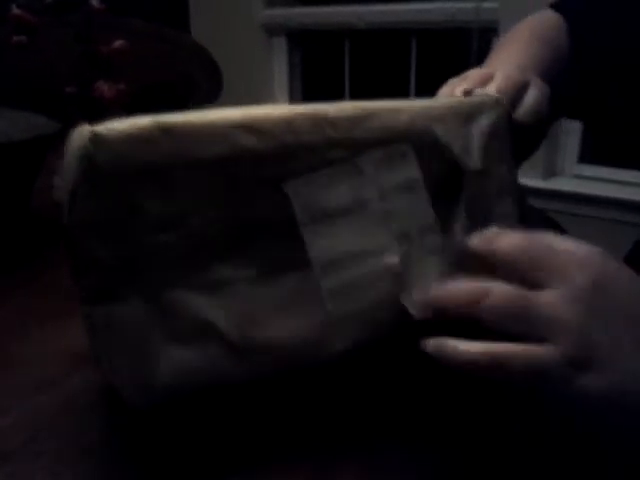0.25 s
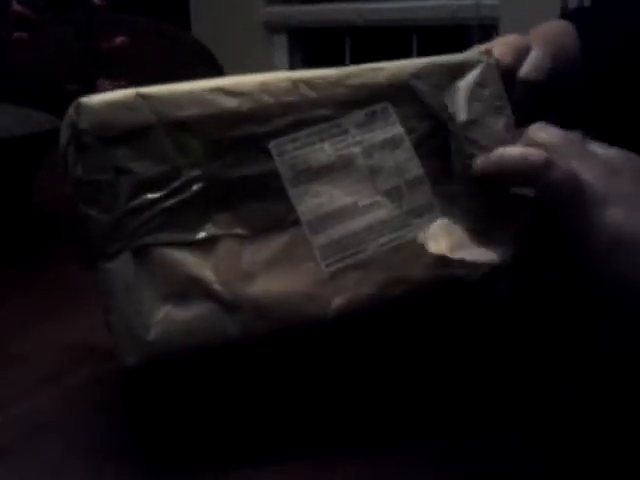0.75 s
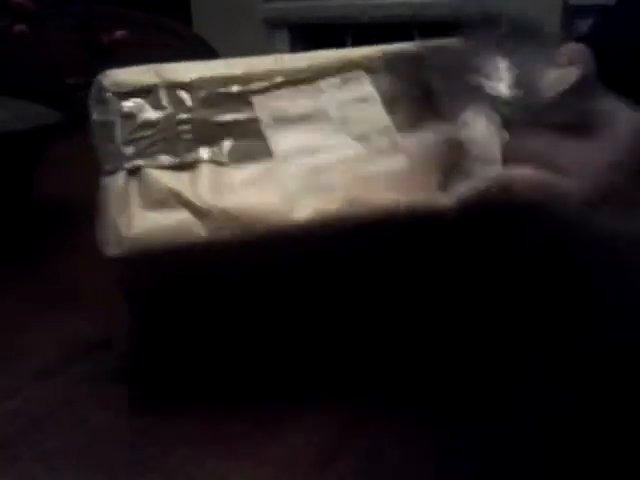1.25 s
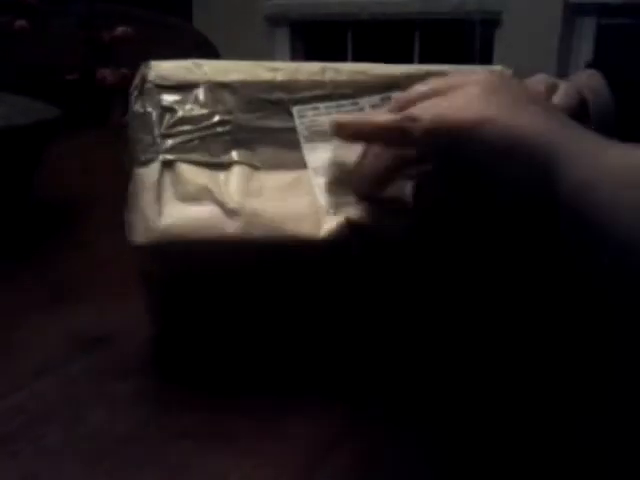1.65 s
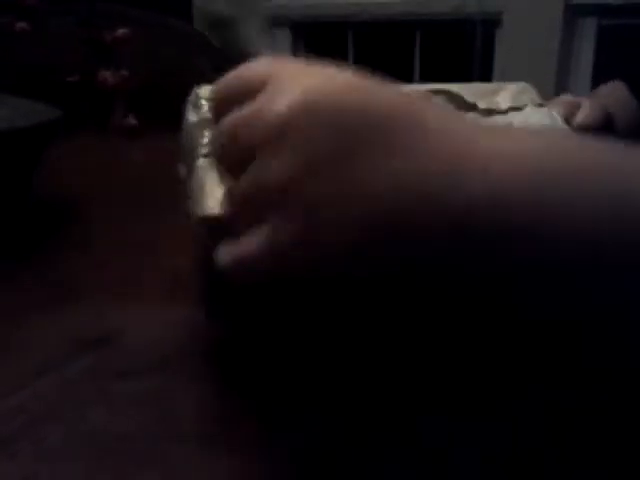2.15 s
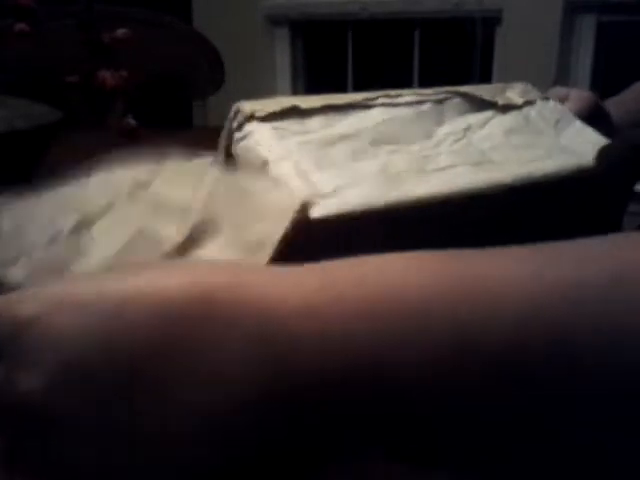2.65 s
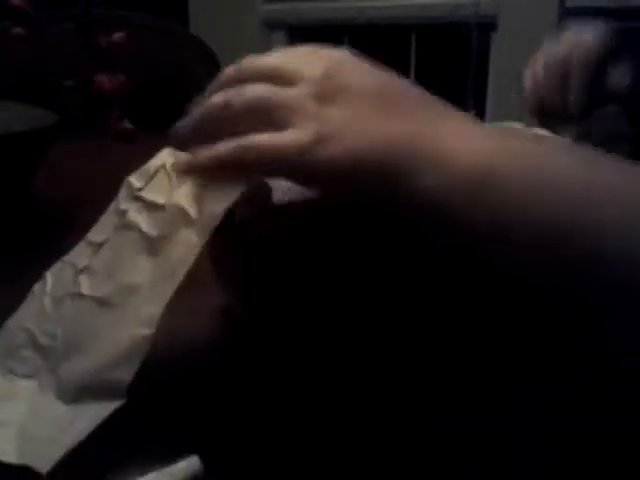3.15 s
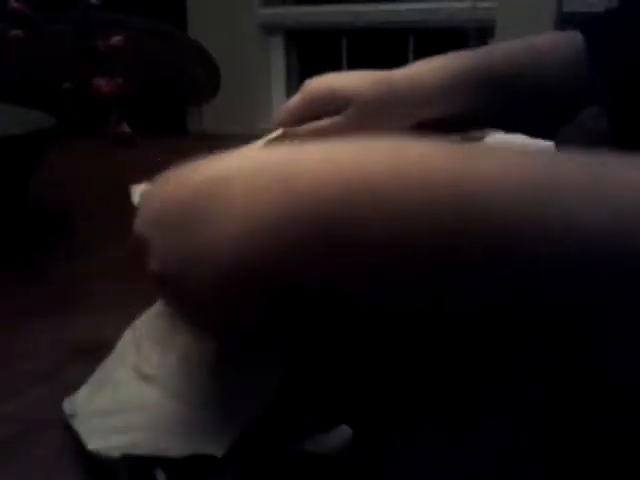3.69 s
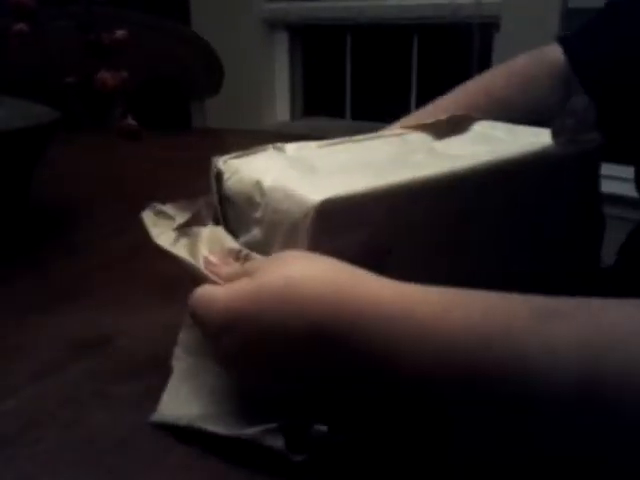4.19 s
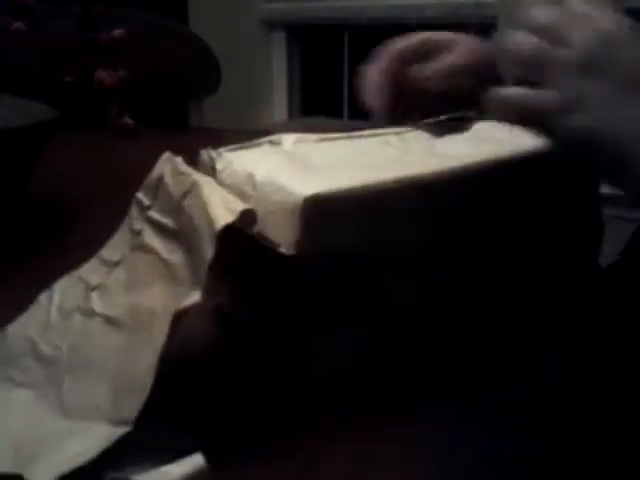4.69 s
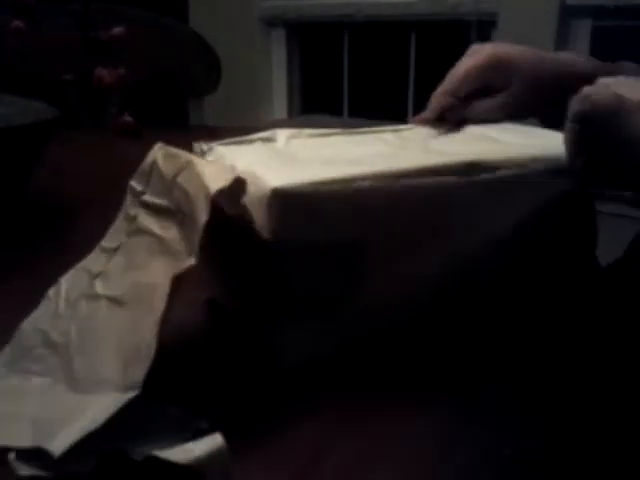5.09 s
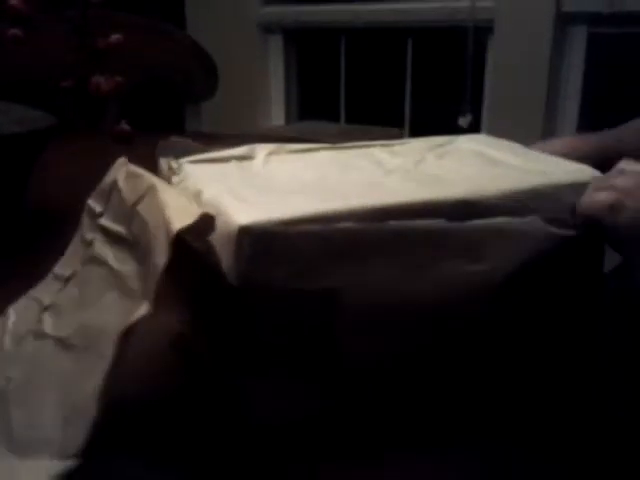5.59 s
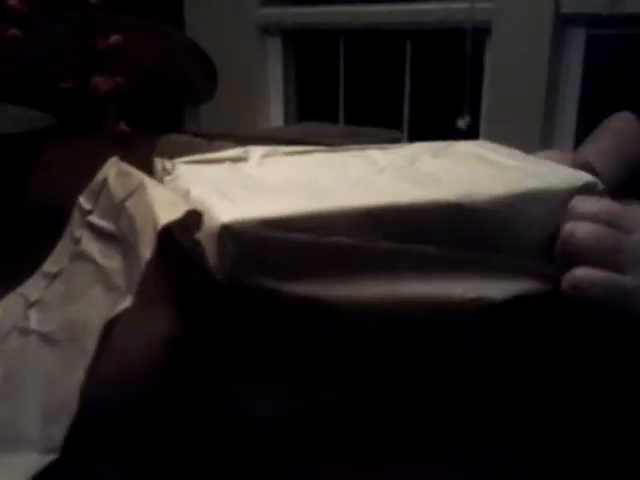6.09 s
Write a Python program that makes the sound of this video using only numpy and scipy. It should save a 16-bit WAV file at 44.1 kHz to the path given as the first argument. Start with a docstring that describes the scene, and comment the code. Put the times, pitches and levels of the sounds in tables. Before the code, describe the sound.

Stiff wrapping paper is pulled off a cardboard parcel by hand, very close to the microphones. It opens with a sharp crunch, then lighter rustling and dry ticks, and another loud, quick crunch at about 1 second. Near 1.8 seconds tugs jolt the box with a few short hollow knocks. A longer hissing rip follows from about 1.9 to 2.3 seconds, running into dense crackling with the loudest snaps and another knock near 2.7 seconds. The paper eases briefly around 3 seconds, then is crushed again from about 3.5 to 4.5 seconds, a little fuller in tone. From 5 seconds come shorter crinkles and separate crease snaps, with a last crunch near 6.2 seconds. The room is quiet and fairly dry, with a soft low rumble and faint hum throughout.

```python
"""A table in a quiet room, a pair of small microphones close to a parcel being unwrapped.
Hands tear and crumple the stiff paper: creases buckle with short snaps and dry ticks over a dense
crackle of fibres, one long rip hisses, and tugs knock the cardboard box. The house rumbles and hums
softly underneath. The microphones ring near 7 kHz and overload on the loudest snaps."""
import sys
import numpy as np
from scipy import signal
from scipy.io import wavfile
from scipy.ndimage import map_coordinates

SR = 44100
rng = np.random.default_rng(int(sys.argv[2]) if len(sys.argv) > 2 else 0)


def unload_wav(signal):
    """Save mono or channel-first audio to the path in sys.argv[1] as 16-bit WAV at rate SR, clipped to [-1, 1]."""
    wavfile.write(
        sys.argv[1],
        SR,
        np.round(np.clip(np.atleast_2d(signal).T, -1, 1) * 32767).astype(np.int16),
    )


N = 279617
EDGES_HZ = 30 * 2 ** np.arange(0, 9.6, .5)   # half-octave bands
PORT_HZ, PORT_WIDTH_HZ, PORT_DB = 7216, 1210, 10.5   # resonance of the microphone ports


def amp(db):
    """Gain of a level in dB."""
    return 10 ** (np.asarray(db) / 20)


def unit_rms(x):
    """Scale to unit rms."""
    return x / np.sqrt(np.mean(x ** 2) + 1e-20)


def at_hz(rows, hz):
    """Columns of a table read on a log-frequency axis."""
    f, *columns = np.transpose(rows)
    return [np.interp(np.log(hz), np.log(f), c) for c in columns]


def in_time(rows):
    """Columns of a table as curves, one value a sample."""
    s, *columns = np.transpose(rows)
    return [np.interp(np.arange(N) / SR, s, c) for c in columns]


def resonance(x, hz, width_hz):
    """Two-pole band-pass, gain 1 on top."""
    r = np.exp(-np.pi * width_hz / SR)
    poles = [1, -2 * r * np.cos(2 * np.pi * hz / SR), r * r]
    return signal.lfilter((1 - r * r) / 2 * np.array([1, 0, -1]), poles, x)


def filtered(x, hz, kind="band", order=2):
    """Smooth band-, low- or high-pass."""
    return signal.sosfilt(signal.butter(order, hz, kind, fs=SR, output="sos"), x)


def half_octave(x, k):
    """Band number k of a signal."""
    return filtered(x, [EDGES_HZ[k], min(EDGES_HZ[k + 1], .45 * SR)])


# The stereo image. Each row: frequency in Hz, likeness of the two sides (0-1), left minus right in dB.
STEREO_IMAGE = [(202, 0.9, 0.5), (480, 0.88, 0), (1050, 0.35, -1.5), (2050, 0.39, 1.5), (5350, 0.08, 1.5),
                (11800, 0, 4)]
def mic_pair(mid, side, hz):
    """Two microphones hear nearly the same bass but unlike treble."""
    alike, tilt_db = at_hz(STEREO_IMAGE, hz)
    both = np.sqrt(1 + alike) * mid + np.sqrt(1 - alike) * side * [[1], [-1]]
    return both * amp([[tilt_db / 2], [-tilt_db / 2]]) / np.sqrt(2)


# Room tone behind the table. Each row: frequency in Hz, relative spectral density in dB.
RUMBLE_SPECTRUM = [(70, -11), (130, -13), (210, -6.5), (320, -1), (420, -13.5), (520, -12), (800, -12.5),
                   (1300, -26.5), (15000, -47)]
def rumble(level_db=-35):
    """Steady low noise of the house, nearly the same at both microphones."""
    white = rng.standard_normal((2, 2, N))
    out = 0
    for k in range(len(EDGES_HZ) - 1):
        hz = np.sqrt(EDGES_HZ[k] * EDGES_HZ[k + 1])
        out = out + amp(at_hz(RUMBLE_SPECTRUM, hz)[0]) * mic_pair(*half_octave(white[k % 2], k), hz)
    return amp(level_db) * unit_rms(out)


# Faint hum of the house. Each row: pitch in Hz, level in dB.
HUM_TONES = [(328, -46.5)]
def hum(width_hz=2.6):
    """A wavering low tone, the same at both microphones."""
    return sum(amp(db) * unit_rms(resonance(rng.standard_normal(N), hz, width_hz))
               for hz, db in HUM_TONES)


def room_echoes(x, t60_s=0.085, level_db=-13):
    """Table and walls return a short decaying scatter of echoes, partly shared by the microphones."""
    t = np.arange(SR // 3) / SR
    shared, left, right = rng.standard_normal((3, len(t)))
    tail = (0.54 * shared + np.array([left, right])) * amp(-60 * t / t60_s) * (t > .003)
    tail = amp(level_db) * tail / np.sqrt((tail ** 2).sum(axis=1, keepdims=True))
    return signal.fftconvolve(x, tail, axes=1)[:, :N]


# Where the hands are before the microphones.
# Each row: time in seconds, left minus right in dB, lag of the left side in samples.
HAND_POSITIONS = [(0, -3, -3.5), (1.7, -3, 1), (2.2, -4.5, 4), (4.2, -4, 1), (4.7, -3, -3.5)]
def at_hands(x):
    """Level and delay between the microphones shift as the hands move."""
    pan_db, lag = in_time(HAND_POSITIONS)
    left = map_coordinates(x[0], [np.arange(N) - lag], order=3)
    return np.array([left * amp(pan_db / 2), x[1] * amp(-pan_db / 2)])


# The box on the table, hollow then lid. Each row: pitch in Hz, time to fall 60 dB in seconds.
BOX_MODES = [(300, 0.024), (690, 0.017)]
# Tugs on the parcel. Each row: start in seconds, level of the hollow in dB, level of the lid in dB.
BOX_KNOCKS = [(1.709, -42.5, -9), (1.768, -34, -8), (1.829, -5.5, -4), (1.872, -4.5, -2), (2.32, -12, -13),
              (2.691, -5.5, -22), (3.712, -28, -9)]
def box_knocks(attack_s=0.00057):
    """A tug on the paper jolts the cardboard box, whose two modes ring briefly."""
    out, t = np.zeros(N), np.arange(4096) / SR
    attack = 1 - np.exp(-t / attack_s)
    for s, *levels_db in BOX_KNOCKS:
        i = int(s * SR)
        for (hz, t60), level_db in zip(BOX_MODES, levels_db):
            out[i:i + len(t)] += amp(level_db - 60 * t / t60) * attack * np.sin(2 * np.pi * hz * t)
    return out


# The long rip. Each row: time in seconds, centre in Hz, level against the crackle in dB.
RIP_PATH = [(1.88, 6460, -41), (1.95, 6300, -6), (2.07, 6300, -11), (2.17, 7340, -30), (2.25, 7850, -1),
            (2.33, 6700, -28.5)]
def long_rip(crackle_db, half_width_hz=600):
    """The tear hisses in a narrow band that slides with the width of the strip."""
    hz, level_db = in_time(RIP_PATH)
    slow_noise = filtered(rng.standard_normal((2, 2, N)), half_width_hz, "low")
    phase = 2 * np.pi * np.cumsum(hz) / SR
    mid, side = slow_noise[0] * np.cos(phase) + slow_noise[1] * np.sin(phase)
    return amp(crackle_db + level_db) * unit_rms(mic_pair(mid, side, hz=7000))


# The sheet between pulls. Each row: time in seconds, crackle level in dB, body against treble in dB.
SHEET_RUSTLE = [(0, -21.5, 10.5), (0.2, -36.5, -2.5), (0.43, -39, -0.5), (0.9, -35, 4), (1.1, -35.5, 8),
                (1.28, -41.5, -8), (1.85, -29, 6), (2.1, -24, -2), (2.75, -37.5, 7), (3.2, -45.5, -1),
                (3.55, -30.5, -2), (4.25, -32.5, -3.5), (4.65, -36, 0.5), (5.2, -25, -2.5), (5.65, -31, 0),
                (6.34, -28, 1)]
# Pulls that crunch the paper.
# Each row: peak time in seconds, crackle level in dB, length in seconds, body against treble in dB.
HAND_PULLS = [(0.027, -16, 0.086, -6.5), (0.108, -20.5, 0.036, 2.5), (0.283, -29.5, 0.15, 0.5),
              (0.506, -24.5, 0.035, -4), (0.651, -25, 0.033, -1), (0.785, -21, 0.055, -4),
              (1.025, -8.5, 0.034, -0.5), (1.058, -21.5, 0.18, -4), (1.4, -29.5, 0.21, 1),
              (1.647, -22, 0.16, -3), (1.833, -11, 0.013, 1), (1.896, -18.5, 0.3, -1.5),
              (2.243, -17.5, 0.17, -0.5), (2.507, -20.5, 0.38, -4), (2.697, -20.5, 0.16, -2.5),
              (2.913, -29.5, 0.18, -1), (3.37, -31.5, 0.26, 1), (3.709, -16, 0.044, -4.5),
              (3.903, -23.5, 0.64, 0.5), (4.11, -19.5, 0.12, 1.5), (4.162, -20, 0.056, -5.5),
              (4.32, -23, 0.037, 4), (4.345, -26, 0.19, 1.5), (4.511, -25.5, 0.14, -5),
              (4.98, -27, 0.21, -4), (5.027, -28.5, 0.033, 7), (5.153, -23.5, 0.088, 4),
              (5.269, -21, 0.077, -4), (5.49, -23, 0.075, -3.5), (5.774, -28, 0.033, 9),
              (5.943, -27, 0.049, 10), (6.17, -17.5, 0.081, -2.5), (6.335, -31, 0.041, -16)]
def hands(rise_db=22, fall_db=15.5, roundness=1.123):
    """Level and colour of the crackle: rustle and swelling pulls add in power, the loudest leading."""
    t = np.arange(N) / SR
    rustle_db, rustle_body_db = in_time(SHEET_RUSTLE)
    power = amp(2 * rustle_db)
    weighted_body = power * rustle_body_db
    for s, peak_db, length_s, body_db in HAND_PULLS:
        lengths_away = np.minimum(abs(t - s) / length_s, 8)
        drop_db = np.where(t < s, rise_db, fall_db) * lengths_away ** roundness
        pull = amp(2 * (peak_db - drop_db))
        power = power + pull
        weighted_body = weighted_body + pull * body_db
    return 10 * np.log10(power), weighted_body / power


# Colour of the paper up close. Each row: frequency in Hz, relative spectral density in dB.
PAPER_SPECTRUM = [(150, -12), (300, -1), (480, -8), (700, -1.5), (1100, -1), (1800, 2.5), (3200, -0.5),
                  (5200, -5), (14500, -4)]
# Low end of the crackle, fuller once the loose sheet is crushed. Each row: time in seconds, gain in dB.
CRACKLE_LOWS = [(2.6, 0.5), (4.2, 2), (4.8, 1)]
# Top octave of the crackle. Each row: time in seconds, gain in dB.
CRACKLE_HIGHS = [(2.8, -3.5), (3.2, -7), (5.2, -11), (6.34, -5)]
LOWS_BELOW_HZ, BODY_BELOW_HZ, HIGHS_ABOVE_HZ = 1400, 4500, 10000
CREASES_PER_S = 450   # at a crackle level of -30 dB
CREASE_SPREAD_DB, CREASE_COLOUR_DB, CREASE_MS = 5.5, 5, 0.7
CLUMP_DB, CLUMPS_PER_S = 1.8, 18   # creases give way in clumps
FIBRES_DB, FIBRES_DULL_DB = -3.5, 4   # hiss against the creases; its loss per octave above PORT_HZ
def crackle(crackle_db, body_db):
    """Small creases pop at random, each a brief noise burst with its own colour, over tearing fibres."""
    busy = amp(0.52 * (crackle_db + 30.0))   # harder pulling folds more creases at once
    creases = rng.choice(N, size=N // 30, replace=False)   # moments when one could give way
    count = len(creases)
    gives_way = rng.random(count) < busy[creases] * CREASES_PER_S * N / SR / count
    size_db = CREASE_SPREAD_DB * np.minimum(rng.exponential(1, count), 1.6)
    colour = rng.standard_normal((count, len(EDGES_HZ)))
    white = rng.standard_normal((2, 2, N))
    clumps = filtered(rng.standard_normal((2, N)), [CLUMPS_PER_S / 2, CLUMPS_PER_S * 2])
    body_db = body_db + CLUMP_DB * unit_rms(clumps[0])
    crackle_db = crackle_db + CLUMP_DB / 2 * unit_rms(clumps[1])
    lows, highs = amp(in_time(CRACKLE_LOWS)[0]), amp(in_time(CRACKLE_HIGHS)[0])
    body, treble = 0, 0
    for k in range(4, len(EDGES_HZ) - 1):
        hz = np.sqrt(EDGES_HZ[k] * EDGES_HZ[k + 1])
        colour_db = CREASE_COLOUR_DB * (colour[:, k] + colour[:, k + 1]) / np.sqrt(2)
        pops = np.zeros(N)
        pops[creases] = gives_way * amp(size_db + colour_db)
        fade = np.exp(-1000 / (SR * CREASE_MS * (1 + 1500 / hz)))   # lower panels shake longer
        swell_and_fade = np.convolve([1, -fade], [1, -fade ** 1.04])
        bursts = unit_rms(signal.lfilter([1], swell_and_fade, pops + 1e-18) / np.sqrt(busy))
        fibres = amp(FIBRES_DB - FIBRES_DULL_DB * max(np.log2(hz / PORT_HZ), 0)) * busy ** 0.45
        mid, side = half_octave(white[k % 2] * np.hypot(bursts, fibres), k)
        heard = amp(at_hz(PAPER_SPECTRUM, hz)[0]) * mic_pair(mid, side, hz)
        heard *= highs if hz > HIGHS_ABOVE_HZ else lows if hz < LOWS_BELOW_HZ else 1
        if hz < BODY_BELOW_HZ:
            body = body + heard
        else:
            treble = treble + heard
    return amp(crackle_db + body_db) * unit_rms(body) + amp(crackle_db) * unit_rms(treble)


# Dry ticks close to the microphones. Each row: start in seconds, level in dB.
PAPER_TICKS = [(0.491, -9.5), (0.697, -10), (0.768, -8), (0.778, -6), (0.855, -20), (1.238, -15),
               (1.347, -10), (1.456, -17), (1.459, -0.5), (1.491, -8), (1.594, -8), (1.765, -0.5),
               (1.911, 5), (1.985, 9), (2.009, 9), (2.145, 0), (2.177, 3), (2.36, -1.5), (2.4174, -6),
               (2.4954, 7), (2.513, 3), (2.5215, 6.5), (2.5365, 0), (2.578, -10), (2.591, -4), (2.6195, 9),
               (2.663, -5), (2.8902, 0.5), (3.033, -11.5), (3.2527, -9.5), (3.304, -8), (3.399, -16),
               (3.462, -1), (3.6078, -13), (3.6248, -13), (3.822, -5.5), (3.86, -11), (3.934, 1),
               (4.029, 1), (4.417, -11.5), (4.674, -10.5), (4.9085, -13), (4.9585, -4), (5.008, -11),
               (5.05, -19), (5.0725, -19), (5.131, -4), (5.205, 2), (5.233, -11), (5.369, -7), (5.398, -12),
               (5.441, -4), (5.483, -13), (5.902, -21)]
def ticks(decay_s=0.000325, band_hz=(2360, 9200)):
    """Taut paper parts with a quick bright burst; no panel rings."""
    out, t = np.zeros((2, N + 256)), np.arange(256) / SR
    for s, level_db in PAPER_TICKS:
        burst = rng.standard_normal((2, len(t))) * t * np.exp(-t / decay_s)
        tick = mic_pair(*filtered(burst, band_hz), hz=2400)
        i = int(s * SR)
        out[:, i:i + len(t)] += amp(level_db) * tick / abs(tick.mean(0)).max()
    return out[:, :N]


# Creases snapping close to the microphones.
# Each row: start in seconds, ring level in dB, ring pitch in Hz, crack level in dB.
CREASE_SNAPS = [(0.108, -5, 1720, -4), (0.325, -9, 1890, -29), (0.352, -10.5, 2670, -9.5),
                (0.4557, -13, 2890, -22), (0.4976, -1, 2730, -4.5), (0.504, -9, 2250, -6.5),
                (0.511, -4.5, 2440, -30), (0.554, -4.5, 3550, -31), (0.706, -7, 3100, -8.5),
                (0.7495, -10, 2140, -31), (0.803, -3.5, 2000, -14), (0.842, -1, 1960, -30),
                (0.8665, -10.5, 2770, -32), (1.622, -0.5, 4220, -15), (1.7077, -5.5, 2370, -8),
                (1.7684, -6, 1680, -22), (1.821, -2, 1520, -4.5), (1.8407, 7, 1700, -17),
                (1.869, 5.5, 2390, -1), (2.271, 4.5, 3940, -22), (2.3215, -7, 1980, -3),
                (2.4468, -0.5, 4100, -0.5), (2.686, 3, 1730, 0), (2.823, -6.5, 1570, -8),
                (3.3393, -9.5, 2170, -6), (3.453, -8.5, 1830, -10), (3.474, -3.5, 1640, -12),
                (3.485, -5, 2000, -12), (3.5703, -3.5, 1550, -8), (3.6502, -9, 1540, -9),
                (3.7026, -6.5, 1830, -28), (3.714, 0, 1350, -21), (3.913, -6, 1230, -16),
                (3.979, -4, 1860, -9), (4.005, -1.5, 2600, -11), (4.0199, 1, 2500, -15),
                (4.08, -10.5, 3000, -21), (4.317, -12.5, 1640, -11), (5.095, -8.5, 2000, -23),
                (5.109, -4, 2080, -14), (5.305, -10.5, 1890, -22), (5.426, -7, 1380, -10),
                (5.508, -4.5, 2240, -10.5), (5.6428, -5, 2130, -5.5), (5.6773, -2.5, 2010, -44),
                (5.7407, 0, 2470, -9), (5.7945, -5.5, 1890, -39), (5.8466, -2, 2140, -7.5),
                (5.887, -11, 1930, -33), (5.9253, 1, 2540, -1), (5.967, -9, 2360, -14),
                (6.181, -3, 1860, 1.5), (6.323, -4.5, 1730, -4.5)]
SNAP_S = 0.00368   # time scale at 0 dB and 2 kHz; louder and lower panels snap longer
def snaps(growth=0.43, pitch_law=0.45, ring_width_share=0.45, crack_band_hz=(3800, 12000)):
    """A crease buckles: a bright crack, and the flat panel beside it rings for a few cycles."""
    out, t = np.zeros((2, N + 1024)), np.arange(1024) / SR
    for s, ring_db, hz, crack_db in CREASE_SNAPS:
        length_s = SNAP_S * amp(growth * ring_db) * (2000 / hz) ** pitch_law
        attack = 1 - np.exp(-(t / (0.48 * length_s)) ** 2)
        decay = np.exp(-(t / (0.6 * length_s)) ** 1.23)
        burst = rng.standard_normal((4, len(t))) * attack * decay
        ring = mic_pair(*resonance(burst[:2], hz, ring_width_share * hz), hz=740)
        crack = mic_pair(*filtered(burst[2:], crack_band_hz), hz=11000)
        i = int(s * SR)
        for part, level_db in (ring, ring_db), (crack, crack_db):
            out[:, i:i + len(t)] += amp(level_db) * part / abs(part.mean(0)).max()
    return out[:, :N]


def scene():
    """The parcel up close, its echoes from table and walls, and the house behind."""
    crackle_db, body_db = hands()
    paper = crackle(crackle_db, body_db) + long_rip(crackle_db) + snaps() + ticks()
    parcel = at_hands(paper + box_knocks())
    return parcel + room_echoes(parcel) + rumble() + hum()


LOW_CUT_HZ, OVERLOAD, TOP_CUT_HZ = 120, 0.92, 15100
def record(dry):
    """The small microphones: low cut, port resonance, hard overload, steep top cut."""
    heard = filtered(dry, LOW_CUT_HZ, "high", order=3)
    heard = heard + (amp(PORT_DB) - 1) * resonance(heard, PORT_HZ, PORT_WIDTH_HZ)
    heard = np.clip(heard, -OVERLOAD, OVERLOAD)
    return signal.sosfilt(signal.cheby2(12, 45, TOP_CUT_HZ, fs=SR, output="sos"), heard)


dry = scene()
out = record(dry)
unload_wav(out)
```